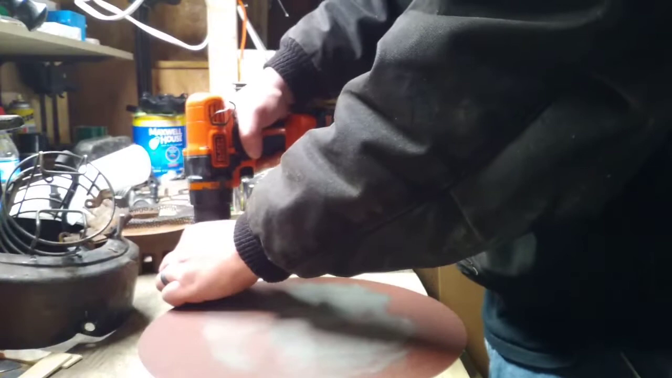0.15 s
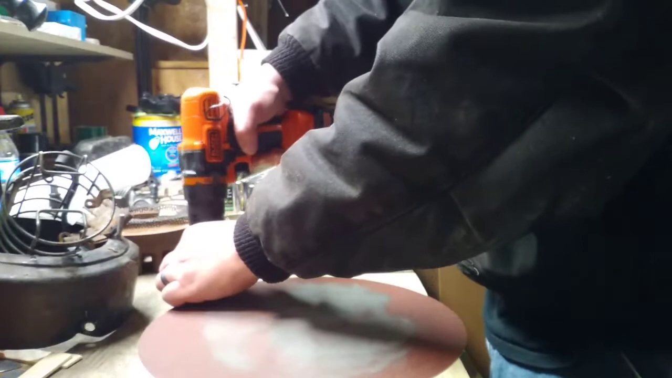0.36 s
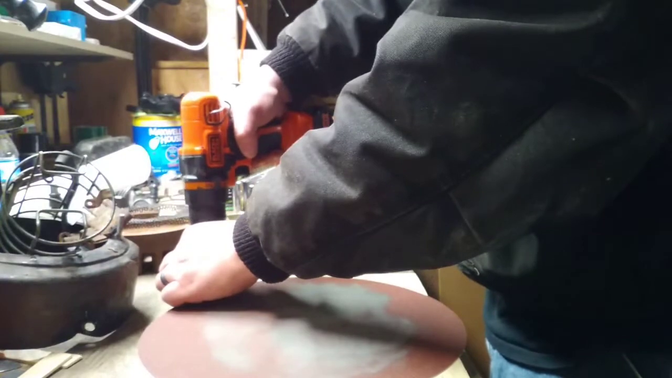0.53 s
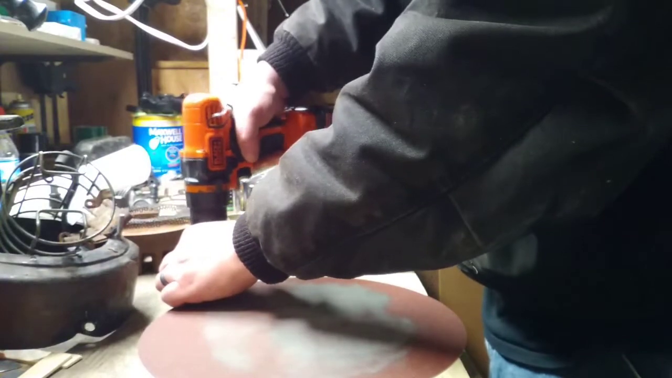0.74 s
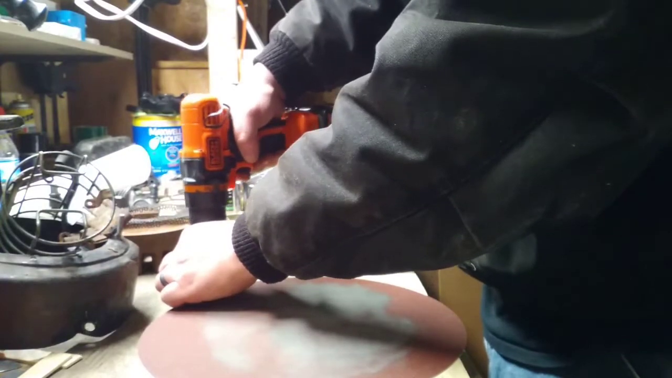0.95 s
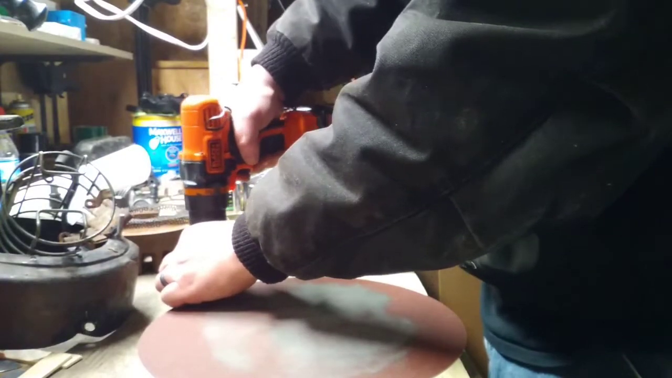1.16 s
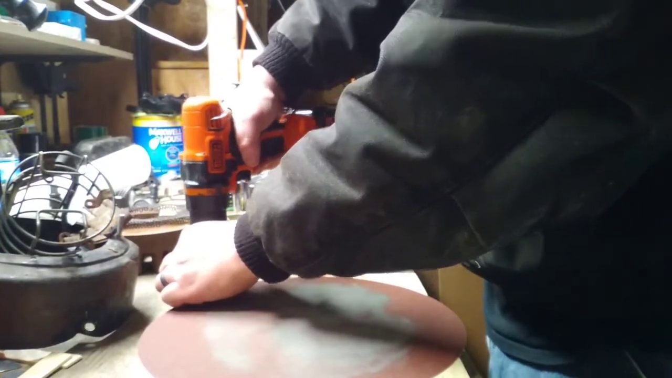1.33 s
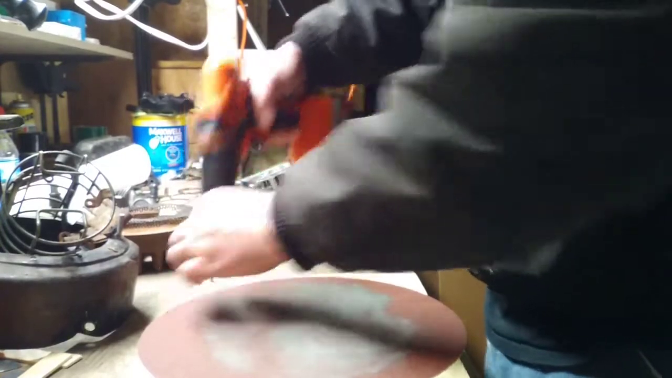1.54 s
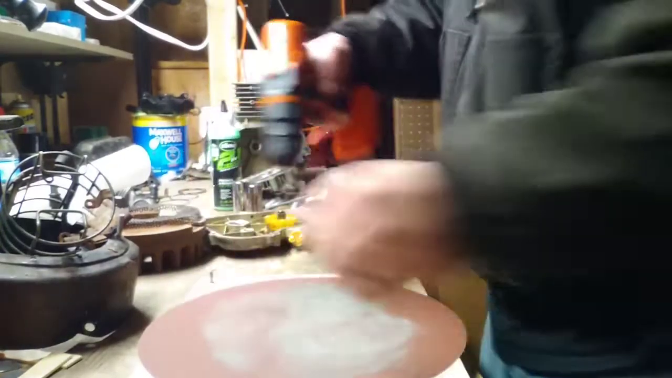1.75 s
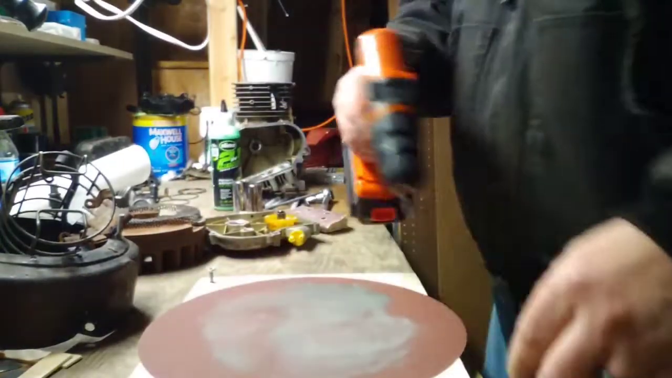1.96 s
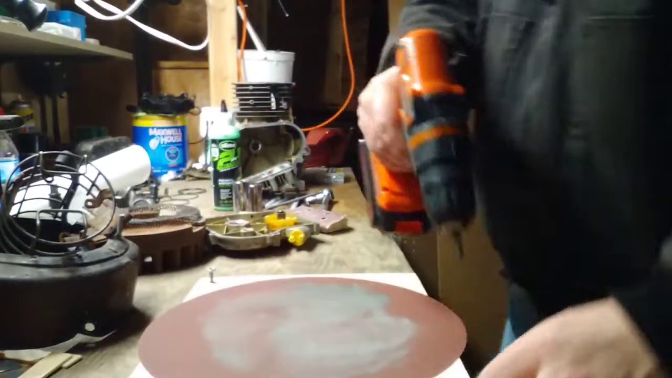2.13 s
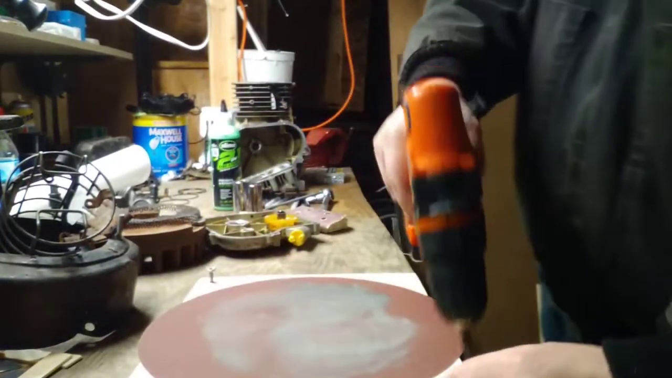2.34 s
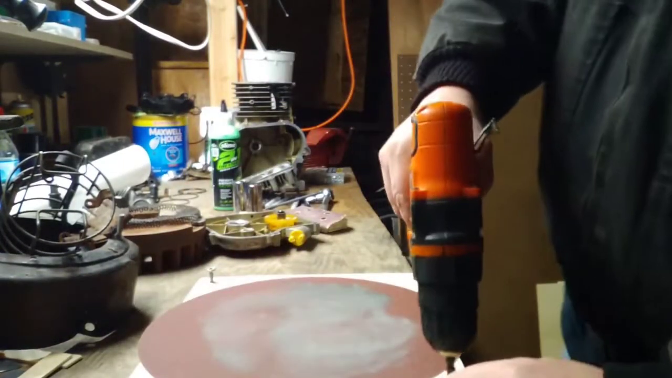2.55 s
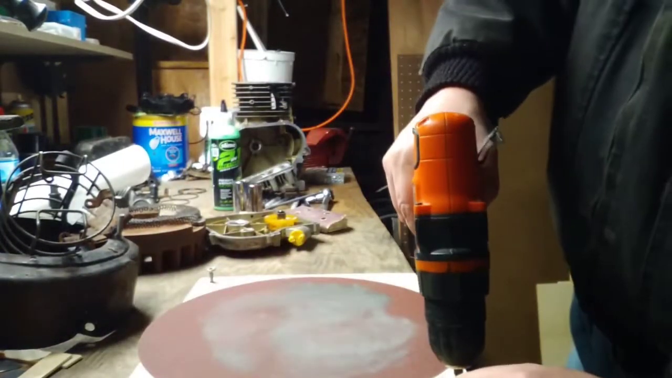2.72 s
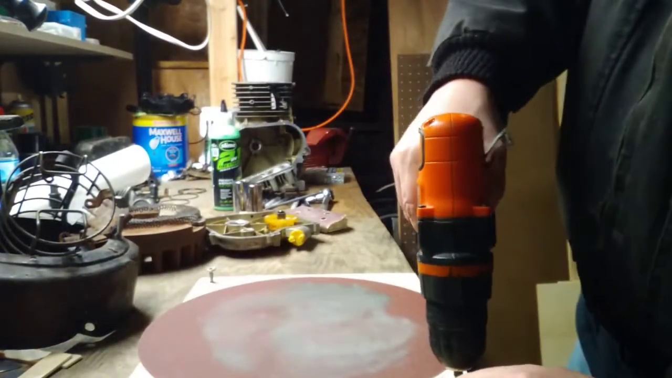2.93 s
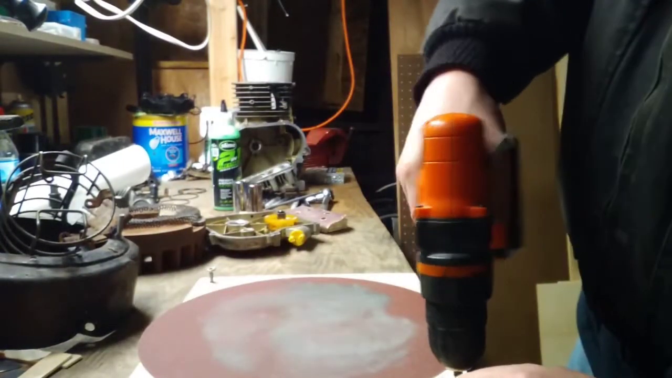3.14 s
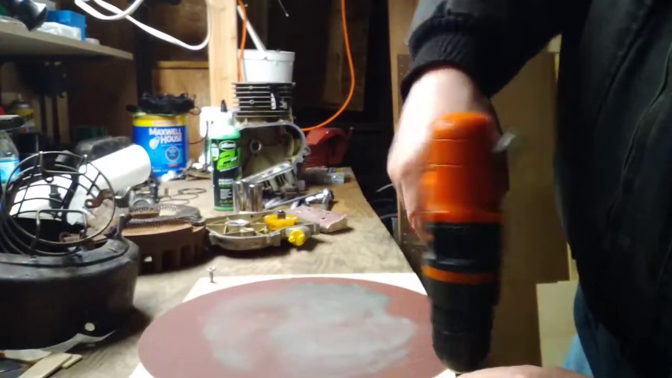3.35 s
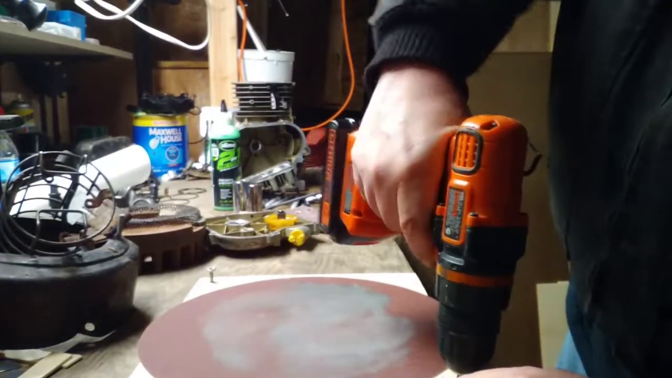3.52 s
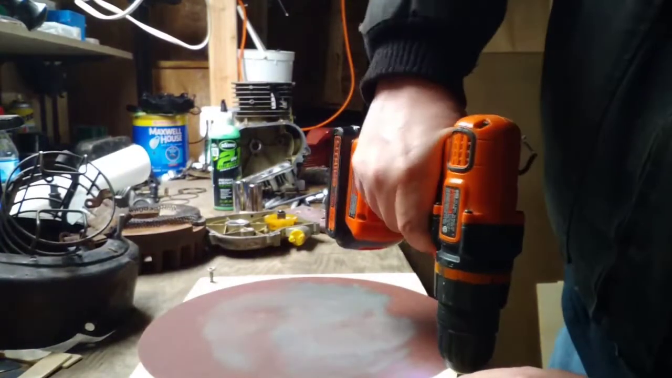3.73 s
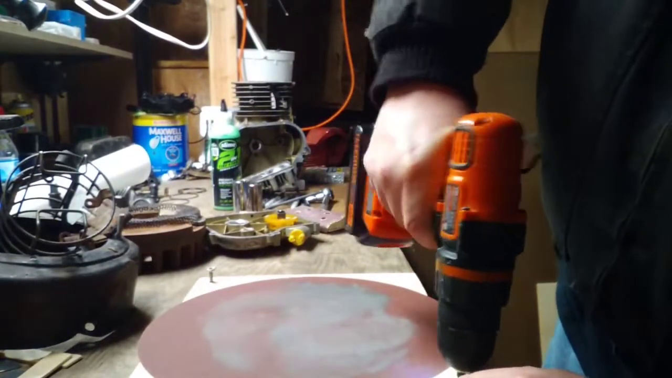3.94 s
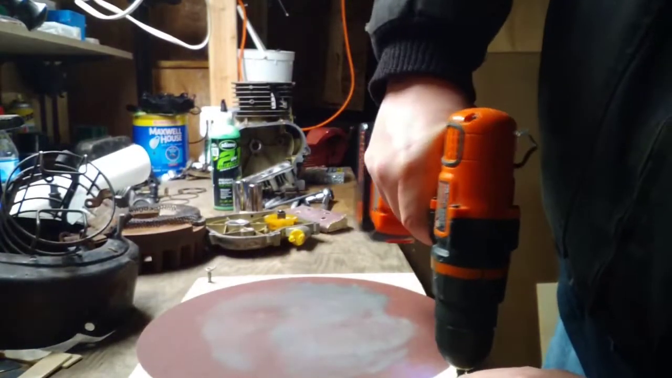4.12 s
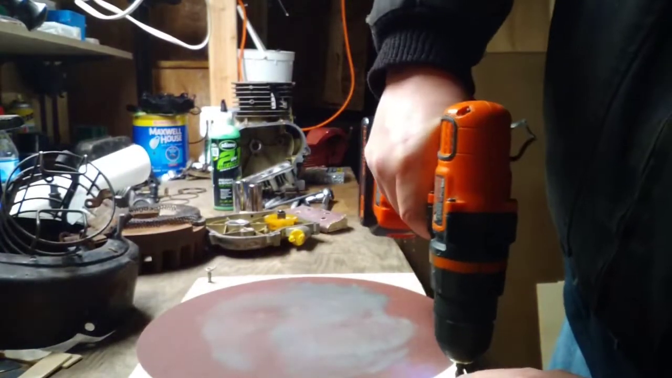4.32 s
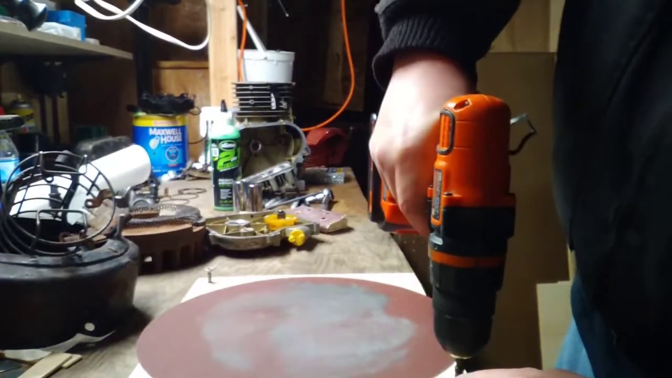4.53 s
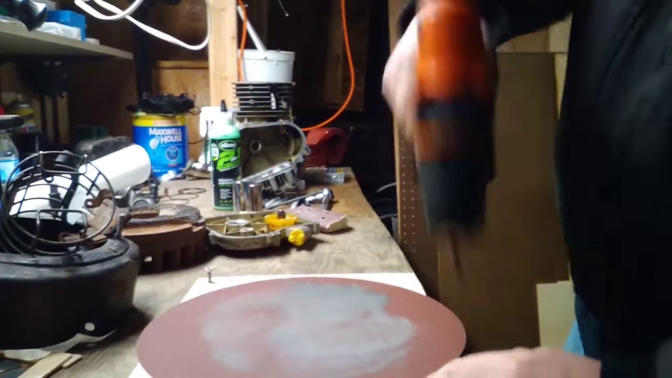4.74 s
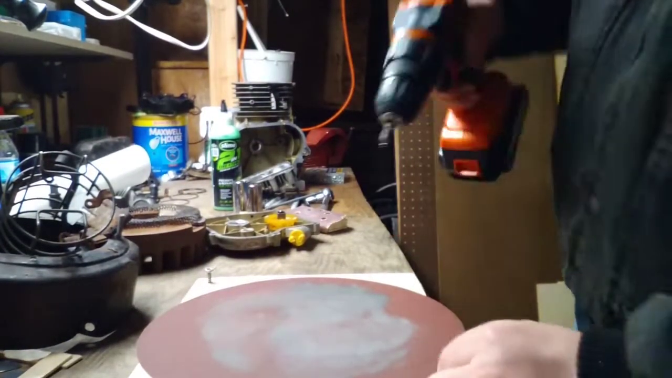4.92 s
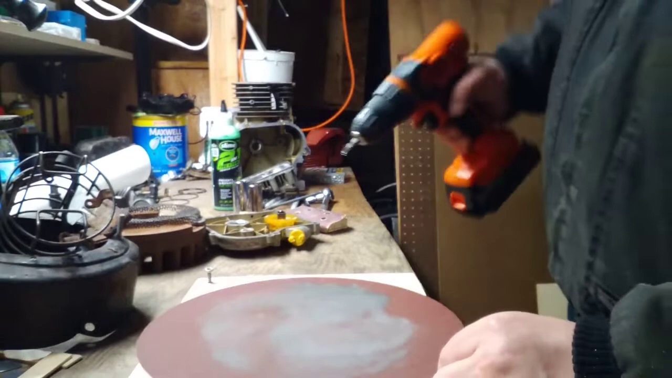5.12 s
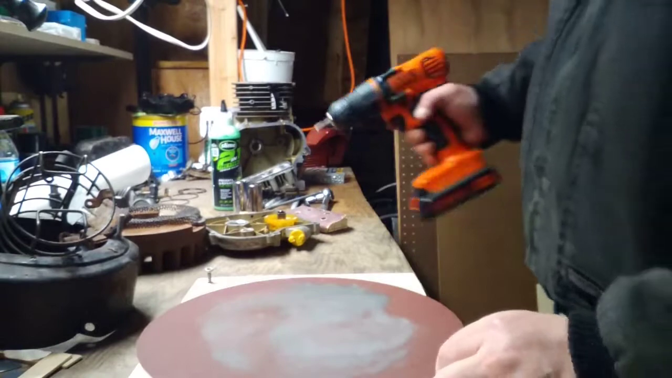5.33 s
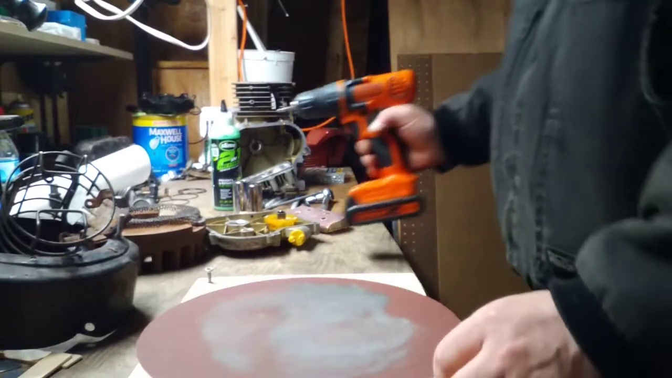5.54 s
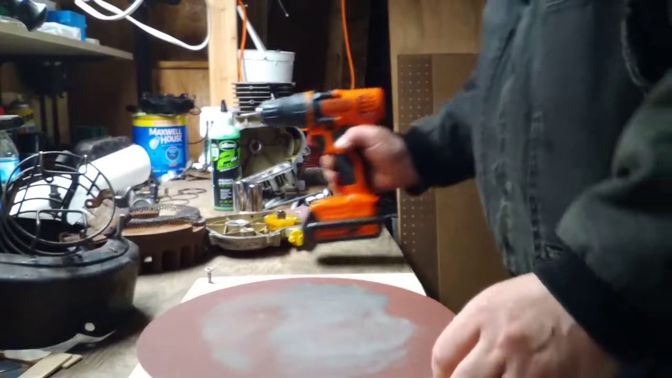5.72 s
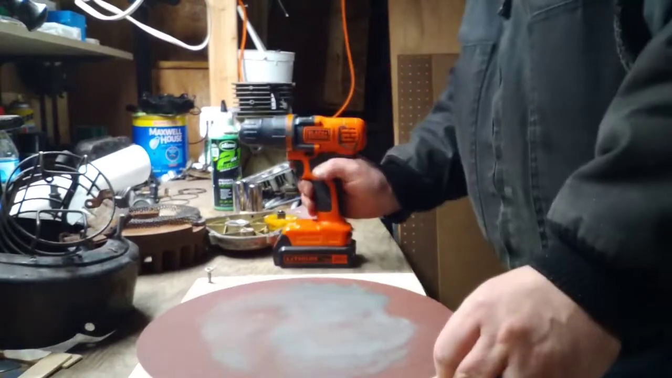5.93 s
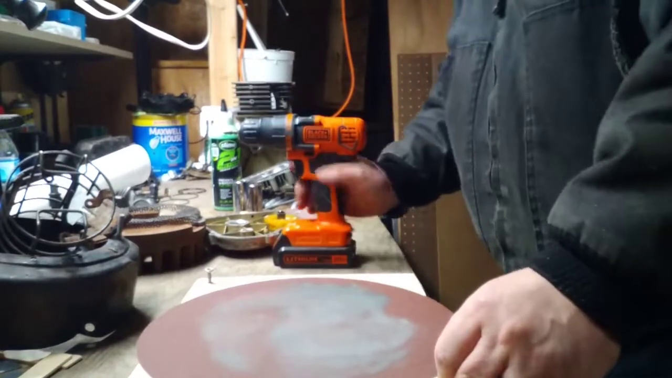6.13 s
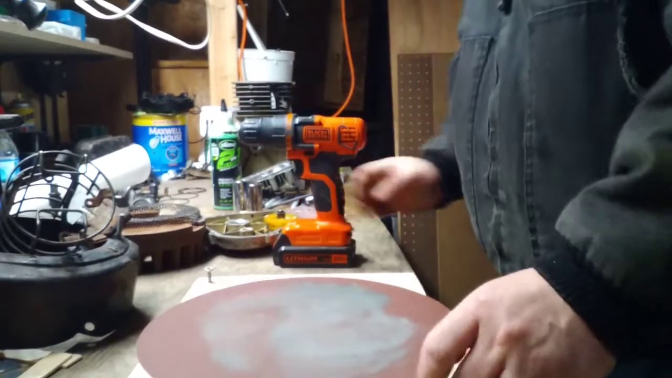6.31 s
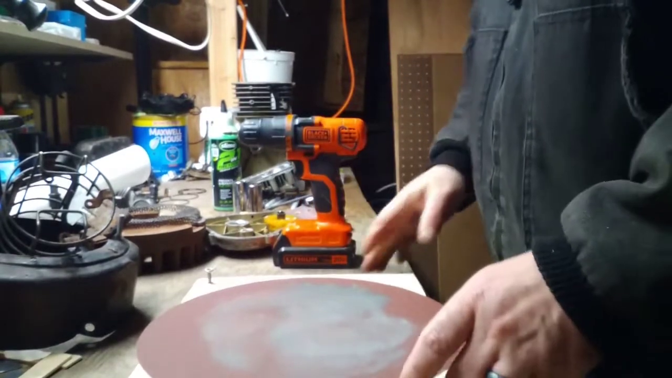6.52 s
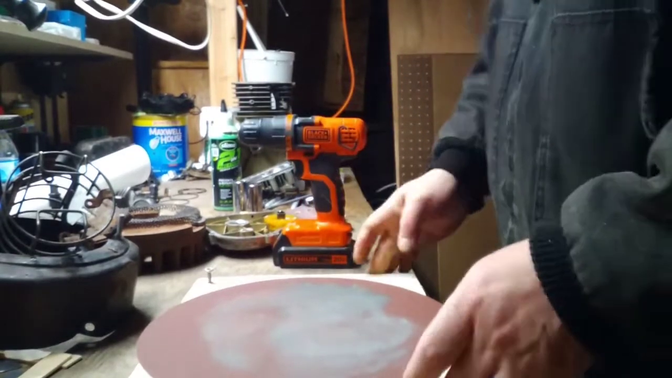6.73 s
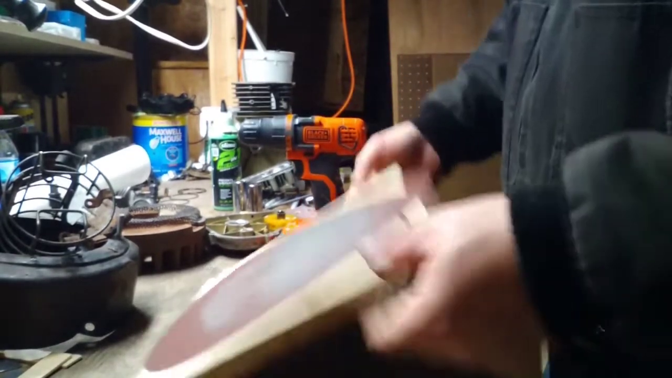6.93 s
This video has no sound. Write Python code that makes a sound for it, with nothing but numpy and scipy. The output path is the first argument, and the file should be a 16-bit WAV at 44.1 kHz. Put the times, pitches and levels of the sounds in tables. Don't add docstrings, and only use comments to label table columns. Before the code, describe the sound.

Phone-style stereo close to a workbench in a small shed with short reflections and soft hiss. A cordless drill gives a brief loaded growl, then, after clothing rustle, crisp bit ticks and knocks on a board, a second, longer whining run that rises in pitch and stops quickly. The tool is put down with a heavy knock and a short metallic jingle, leaving faint clicks, sleeve rustle and a low distant drone.

```python
import sys
import numpy as np
from scipy import signal
from scipy.fft import rfft, irfft, next_fast_len
from scipy.io import wavfile
from scipy.ndimage import map_coordinates

SR = 44100
rng = np.random.default_rng(int(sys.argv[2]) if len(sys.argv) > 2 else 0)


def how_loud(loudness_db):
    steps = np.asarray(loudness_db, float) / 20
    return 10 ** steps


def transcribe(u):
    v = np.clip(np.atleast_2d(u).T, -1, 1)
    q = np.round(v * 32767).astype(np.int16)
    wavfile.write(sys.argv[1], SR, q)


N = 307394

MIC_GAP_S = 20.8 / 44100
LEAD_S = .005

# (frequency [Hz], density [dB per Hz])
AIR_SPECTRUM = [(20, -61.5), (50, -10), (95, -0.5), (180, -6.5), (300, -14), (600, -18), (900, -19.5),
                (1400, -24), (2000, -23.5), (2900, -27.5), (5000, -35), (9000, -42.5), (14200, -45.5),
                (15500, -92)]
# (time [s], level [dB])
RUMBLE_LEVEL = [(0, -74.5), (.6, -69), (1.8, -76), (2.3, -69.5), (3.3, -77.5), (3.8, -65), (5.1, -69),
                (5.9, -62.5), (7, -65.5)]
# (middle [s], half length [s], level over the still air [dB])
SLEEVES = [(0, 0.08, 8.5), (1.716, 0.12, 7), (2.08, 0.27, 5), (2.423, 0.18, 7.5), (2.717, 0.13, 4.5),
           (3.52, 0.039, 4.5), (5.075, 0.22, 7), (6.413, 0.16, 4.5), (6.6, 0.085, 6), (6.794, 0.025, 14.5),
           (6.804, 0.26, 6.5)]
# (start [s], end [s], first frequency [Hz], last frequency [Hz], level [dB])
DRONE_PARTIALS = [(0, 0.573, 87.8, 93.5, -68), (1.596, 2.3, 140.6, 141.5, -78),
                  (3.051, 3.55, 88, 86.7, -71.5), (3.201, 3.553, 173, 181, -80),
                  (3.68, 3.85, 90, 88, -72.5), (4.809, 5.098, 93.8, 93.5, -70.5),
                  (4.801, 5.5, 155.5, 162, -71.5), (5.248, 6.102, 93.4, 99.1, -64.5),
                  (5.5, 6.051, 413.4, 420, -86), (5.615, 6.103, 171.9, 172.6, -66.5),
                  (6.248, 7.1, 105, 114.5, -70), (6.25, 6.497, 185, 179, -77),
                  (6.416, 6.851, 148, 151.4, -67.5), (6.699, 7.1, 185.4, 183, -68)]
# (frequency [Hz], t60 [s])
SHED_DECAY = [(100, .22), (400, .18), (1100, .14), (8000, .14)]
# (time [s], left lag [samples])
SOURCE_LAG = [(0, -7.5), (.9, -5), (1.1, -1.5), (1.6, -4), (2.3, 5), (3.5, 11), (4.8, 3), (6.0, -4.5),
              (7, -2)]
# (frequency [Hz], gain [ratio])
CROSS_GAIN = [(100, .93), (2100, .93), (5300, .85), (8400, .4), (12000, .1)]

# (frequency [Hz], width [Hz], level [dB])
BENCH_MODES = [(80, 38, -0.5), (119, 49, -1), (173.3, 42, -2), (249.3, 11, -11)]
BOARD_MODES = [(289, 24, 6), (419, 85, -0.5), (614, 140, -2.5), (795.4, 190, -5), (1263, 760, -16)]
HOUSING_MODES = [(1513.6, 360, -1), (2420, 380, -0.5), (3260, 980, -6)]
STEEL_MODES = [(3900, 480, 3.5), (5300, 3600, 5.5), (6020, 4500, 5), (9000, 2500, -6),
               (12600, 14000, -13.5)]
# (frequency [Hz], width [Hz], level [dB])
BOOM_MODES = [(195, 8.1, -0.5), (85, 59, -8)]
GEARBOX_MODES = [(607, 45, 0)]
# (frequency [Hz], level [dB], t60 [s])
LOOSE_PARTS = [(2800, -9, .3), (5190, -8, .3), (5450, -9, .24), (6850, -13, .2), (7780, -13, .18)]

# (time [s], frequency [Hz], level [dB])
SQUEAK_GLIDE = [(3.686, 4700, -97), (3.692, 4800, -80), (3.704, 5300, -81.5), (3.714, 4900, -97.5)]
# (time [s], peak [dB], knock [dB], fizz [dB])
SWITCH_TICKS = [(0.5781, -35, -14.5, -18), (1.0555, -53, 1.5, -10), (1.5489, -50.5, 4.5, -8.5),
                (1.9384, -56.5, -1.5, -17), (2.0394, -71, 3, -19), (2.2044, -69, -6, -7),
                (2.2373, -49.5, -7, -20.5), (2.4895, -60, -21, -15.5), (3.1494, -62, 0, -10.5),
                (3.4092, -61, 4.5, -10), (3.6601, -53, -4.5, -13), (3.8024, -56.5, -2.5, -16.5),
                (3.8536, -37.5, -6, -21.5), (6.2994, -69, 7, -3), (6.7894, -73, -1, 7)]
# (time [s], peak [dB], knock [dB], fizz [dB])
BIT_TICKS = [
    (1.0156, -65.5, -16.5, 1.5),
    (1.1167, -35.5, 0.5, -13.5),
    (1.718, -61, -18.5, -8),
    (2.0931, -46.5, -23.5, -5),
    (2.2852, -19, -14.5, -4),
    (3.8207, -47.5, -13, -5),
    (4.8194, -70, -8, -11),
    (6.5594, -68, -8.5, -7),
]
# (time [s], peak [dB], thud [dB], knock [dB], fizz [dB])
BOARD_KNOCKS = [(0.652, -51.5, 4, 2.5, -28), (0.6839, -48, 5, 5, -29), (0.8421, -28.5, 8.5, 10.5, -17.5),
                (1.125, -33.5, -18, 2, -12), (1.3424, -17.5, 4.5, 7.5, -10), (1.4032, -37, -2.5, -0.5, -24),
                (2.852, -33, 4, 12.5, -33), (2.8774, -39, 6.5, 6, -35), (2.9718, -22, -9, 5, -20.5),
                (3.5541, -29.5, -3, -7.5, -12), (3.9273, -16.5, -12.5, -4.5, -8),
                (4.7863, -60.5, -2.5, 10.5, -18.5), (6.0474, -12, 1, 5.5, -27.5),
                (6.1988, -48.5, 4.5, 3, -17), (6.8929, -58, 26.5, 21, -25)]
# (time [s], peak [dB])
GEAR_STARTS = [
    (1.122, -20.5),
    (3.928, -22.5),
]

# (pull [s], release [s], top speed [Hz], slow sag [Hz], spin-up [s])
TRIGGER_PULLS = [
    (1.11, 1.364, 336, 0, .057),
    (3.917, 4.63, 363.6, 83, .038),
]
# (frequency [Hz], density [dB per Hz])
LOADED_COLOUR = [(20, -63.5), (70, -12), (180, 4.5), (450, -2.5), (800, -7), (1400, -9.5), (2100, -8.5),
                 (2900, -12), (4500, -16), (6700, -22.5), (9500, -22.5), (12500, -23.5), (14200, -54.5),
                 (15500, -89.5)]
FREE_COLOUR = [(20, -61), (70, -17.5), (180, -2), (450, -6.5), (800, -4), (1400, -2), (2100, -1.5),
               (2900, -4), (4500, -12.5), (6700, -14.5), (9500, -18.5), (12500, -16.5), (14200, -32.5),
               (15500, -85.5)]
SHAFT_ORDERS = [1, 1.25, 2, 2.5, 3.75, 5, 6.25, 7.5, 8.75, 10, 11.25, 12, 13, 15, 18]
LOADED_WHINE = [-3, -12, -13, -15, -19, -8, -22, -20, -24, -14, -24, -20, -24, -16, -24]
FREE_WHINE = [-10.5, -22, -24, -7.5, -9.5, -11, -12.5, -14, -18, -22, -14.5, -17.5, -18, -13, -17]
# (order [multiple], level [dB])
BRUSH_COMB = [(19, -27), (24, -23), (27, -19.5), (32, -24), (38, -28), (43, -31)]
# (frequency [Hz], width [Hz], gain [dB])
SHELL_SWELLS = [(305, 27, 8), (775, 45, 4), (1570, 55, 4), (4650, 300, 4.5), (6150, 200, 6),
                (9200, 350, 4.5)]


def unit(x):
    return x / np.sqrt(np.mean(x ** 2) + 1e-20)


def along(points, hz):
    f, v = np.transpose(points)
    return np.interp(np.log(hz + 1), np.log(f + 1), v)


def curves(rows, t):
    s, *columns = np.transpose(rows)
    return [np.interp(t, s, column) for column in columns]


def wobble(rate, size):
    knots = rng.standard_normal(int(size * rate / SR) + 4)
    coarse = map_coordinates(knots, [np.arange(size // 16 + 2) * 16 * rate / SR])
    return np.interp(np.arange(size) / 16, np.arange(len(coarse)), coarse)


def filtered(x, response):
    n = x.shape[-1]
    m = next_fast_len(n + 4096)
    return irfft(rfft(x, m) * response(np.fft.rfftfreq(m, 1 / SR)), m)[..., :n]


def modes(peaks):
    low = peaks[0][0] / 1.6
    top = 1.4 * max(peak[0] for peak in peaks)

    def response(f):
        highpass = 1j * f / (low + 1j * f)
        lowpass = 1 / (1 + 1.2j * f / top - (f / top) ** 2)
        total = 0
        for k, (hz, width, db) in enumerate(peaks):
            total = total + (-1) ** k * how_loud(db) * 1j * f * width / (hz * hz - f * f + 1j * f * width)
        return highpass * lowpass * total
    return response


def alike(hz):
    return .87 * np.sinc(2 * hz * MIC_GAP_S)


def diffuse(size):
    def weights(f):
        turn = np.arccos(alike(f)) / 2
        return np.array([np.cos(turn), np.sin(turn)])
    mid, side = filtered(rng.standard_normal((2, size)), weights)
    return np.array([mid + side, mid - side])


def placed(x, s):
    lag = curves(SOURCE_LAG, s)[0] / SR
    return filtered(x, lambda f: np.exp(-1j * np.pi * f * lag * np.array([[1], [-1]])))


def shed(x, s, wet_db):
    hz, t, z = signal.stft(diffuse(SR // 3), SR, nperseg=256)
    decay = how_loud(-60 * t / along(SHED_DECAY, hz)[:, None])
    tail = signal.istft(z * decay, SR, nperseg=256)[1]
    tail = tail / np.linalg.norm(tail[0])
    delayed = np.pad(x, (130, 0))
    wet = signal.fftconvolve(delayed[None], tail, axes=1)[:, :len(x)]
    return placed(x, s) + how_loud(wet_db) * wet


def shifting(x, s, wet_db, count):
    spot = np.linspace(0, count - 1, len(x))
    return sum(shed(x * np.maximum(1 - np.abs(spot - k), 0), s, wet_db) for k in range(count))


def add(out, x, s):
    part = out[:, round(s * SR):][:, :x.shape[1]]
    part += x[:, :part.shape[1]]


def background():
    t = np.arange(N) / SR
    brush_db = np.max([db * np.exp(-((t - s) / half) ** 2) for s, half, db in SLEEVES], axis=0)
    layers = [(curves(RUMBLE_LEVEL, t)[0], 25, 240, 2.5),
              (-82 + brush_db, 260, 2300, 1.5),
              (-88.5 + .9 * brush_db, 2300, 15000, .8)]
    out = 0
    for db, low_hz, top_hz, drift_db in layers:
        def band(f):
            return how_loud(along(AIR_SPECTRUM, f)) / np.sqrt((1 + (low_hz / (f + 1)) ** 8) * (1 + (f / top_hz) ** 8))
        drift = drift_db * (wobble(2.1, N) + wobble(19, N))
        out = out + how_loud(db + drift) * unit(filtered(diffuse(N), band))
    return how_loud(4.0) * out


def drone(start, end, first_hz, last_hz, db):
    t = np.arange(round((end - start) * SR)) / SR
    hz = first_hz + (last_hz - first_hz) * t / t[-1]
    swell = np.minimum(np.minimum(t, t[-1] - t) / .025, 1)
    level = how_loud(db + 5 + 3.9 * wobble(6.9, len(t)))
    wander = .5 * np.array([wobble(3.2, len(t)), wobble(6.3, len(t))])
    return swell * level * np.sin(2 * np.pi * np.cumsum(hz) / SR + wander)


def squeak():
    t = SQUEAK_GLIDE[0][0] + np.arange(SR // 8) / SR
    hz, db = curves(SQUEAK_GLIDE, t)
    return shed(how_loud(db) * np.sin(2 * np.pi * np.cumsum(hz) / SR), t[0], wet_db=-17.0)


def rattling_parts():
    t = np.arange(SR // 2) / SR
    ring = 0
    for hz, db, t60 in LOOSE_PARTS:
        ring = ring + how_loud(db - 60 * t / t60) * np.sin(2 * np.pi * hz * t + 1.8 * wobble(120, len(t)))
    jolts = rng.standard_normal(len(t)) * how_loud(4.1 * wobble(70, len(t)))
    chatter = unit(filtered(jolts, modes(HOUSING_MODES + STEEL_MODES))) * how_loud(-3.5 - 60 * t / 0.33)
    onset = 1 - np.exp(-t / 0.0028)
    return shed(how_loud(-41) * (ring + chatter) * onset, 6.05, wet_db=1.0)


def blow(s, t60, bodies, rise, contact, tail_db, snap):
    t = np.arange(round(1.6 * t60 * SR)) / SR
    after = np.maximum(t - LEAD_S, 0)
    graze = how_loud(-23) * np.minimum(t / LEAD_S, 1)
    force = (graze + 1 - np.exp(-after / rise)) * np.exp(-after / contact)
    burst = rng.standard_normal(len(t)) * force
    burst[round(LEAD_S * SR)] += snap
    direct = placed(burst, s)
    air = diffuse(len(t)) * (1 - np.exp(-after / 0.0015))
    out = 0
    for body, db, slow in bodies:
        tail = air * how_loud(tail_db - 60 * (t / (slow * t60)) ** 1.276)
        layer = filtered(direct + tail, modes(body))
        out = out + how_loud(db) * layer / np.abs(layer).max()
    return out


def tick(s, db, knock_db, fizz_db, ring_hz):
    bodies = [(BOARD_MODES, db + knock_db + 2, 1.05),
              (HOUSING_MODES + [(ring_hz, 500, 1.5)], db + 2, .95),
              (STEEL_MODES, db + fizz_db + 4.5, .9)]
    return blow(s, .13, bodies, rise=0.0016, contact=0.0049, tail_db=-16.5, snap=4.0)


def knock(s, db, thud_db, knock_db, fizz_db):
    t60 = np.clip(0.22 + 1 * thud_db, .135, 0.2)
    bodies = [(BENCH_MODES, db + thud_db + 6.5, 1.1),
              (BOARD_MODES, db + knock_db + 2.5, 1.05),
              (HOUSING_MODES, db + 2.0, .97),
              (STEEL_MODES, db + fizz_db + 7.5, .85)]
    return blow(s, t60, bodies, rise=0.0013, contact=0.007, tail_db=-8.5, snap=8)


def gear_start(s, db):
    return blow(s, 0.12, [(GEARBOX_MODES, db, 1)], rise=0.0058, contact=0.0072, tail_db=-14, snap=.1)


def speed(t, release, top_hz, sag_hz, spin_up):
    start_hz, easing_s, brake_hz_per_s2 = 130, .5, 15000
    missing = (top_hz - sag_hz - start_hz) * np.exp(-t / spin_up) + sag_hz * np.exp(-t / easing_s)
    braking = brake_hz_per_s2 * np.maximum(t - release, 0) ** 2
    return np.maximum(top_hz - missing - braking, start_hz / 2)


def swell_db(hz):
    grid = np.arange(0, SR / 2, 4)
    gain_db = sum(db * np.exp(-((grid - c) / w) ** 2) for c, w, db in SHELL_SWELLS)
    return np.interp(hz, grid, gain_db)


def motor(pull, colour, orders_db, level_db, grows_db, whine_db, fizz_db, boom_db, gate, lumps_db, wet_db):
    start, held = pull[0], pull[1] - pull[0]
    t = np.arange(round((held + .35) * SR)) / SR
    after = np.maximum(t - held, 0)
    fade_db = 38 * (after / 0.092) ** 3.0
    effort = how_loud(level_db + grows_db * np.minimum(t / held, 1) - fade_db) * (1 - np.exp(-t / .007))
    dull_db = -151 * after
    hz = speed(t, held, *pull[2:])
    turn = 2 * np.pi * np.cumsum(hz * (1 + .001 * wobble(40, len(t)))) / SR

    lumps = how_loud(lumps_db * wobble(180, len(t)))
    teeth = rng.standard_normal(len(t)) * (1 + gate * np.cos(turn)) * lumps
    body = unit(filtered(teeth, lambda f: how_loud(along(colour, f))))
    fizz = filtered(body, lambda f: 1 / (1 + (3000 / (f + 1)) ** 4))
    boom = unit(filtered(teeth, modes(BOOM_MODES)))
    rattle = body + (how_loud(fizz_db + dull_db) - 1) * fizz + how_loud(boom_db) * boom

    orders = list(zip(SHAFT_ORDERS, orders_db))
    orders += [(k, along(BRUSH_COMB, k) + rng.normal(0, 2.5)) for k in range(19, 43)]
    whine = 0
    for k, db in orders:
        level = how_loud(db + swell_db(k * hz) + 1.6 * wobble(14, len(t)))
        whine = whine + level * np.sin(k * turn + .45 * wobble(45, len(t)))
    late_db = -11.5 * np.exp(-t / .05)
    near = shed(effort * how_loud(whine_db + late_db + dull_db) * whine, start, wet_db=-7)
    return shifting(effort * rattle, start, wet_db, count=7) + near


def scene():
    out = background()
    for row in DRONE_PARTIALS:
        add(out, drone(*row), row[0])
    add(out, squeak(), SQUEAK_GLIDE[0][0])
    add(out, rattling_parts(), 6.05)
    for table, ring_hz in [(SWITCH_TICKS, 1400), (BIT_TICKS, 3170)]:
        for row in table:
            add(out, tick(*row, ring_hz), row[0] - LEAD_S)
    for row in BOARD_KNOCKS:
        add(out, knock(*row), row[0] - LEAD_S)
    for row in GEAR_STARTS:
        add(out, gear_start(*row), row[0] - LEAD_S)
    first, second = TRIGGER_PULLS
    add(out, motor(first, LOADED_COLOUR, LOADED_WHINE, level_db=-39.5, grows_db=4.5, whine_db=0.5, fizz_db=0.2,
                   boom_db=-8, gate=0.45, lumps_db=1.5, wet_db=3.0), first[0])
    add(out, motor(second, FREE_COLOUR, FREE_WHINE, level_db=-31.5, grows_db=-1.5, whine_db=1.0, fizz_db=-1.0,
                   boom_db=-10.5, gate=.55, lumps_db=3.0, wet_db=3.5), second[0])
    return out


def widened(hz):
    copy = along(CROSS_GAIN, hz) * np.exp(-2j * np.pi * hz * MIC_GAP_S)
    mid_power = (1 + alike(hz)) * np.abs(1 - copy) ** 2
    side_power = (1 - alike(hz)) * np.abs(1 + copy) ** 2
    return np.array([1 - copy, 1 + copy]) / np.sqrt((mid_power + side_power) / 2)


def roll_off(x):
    return signal.sosfilt(signal.butter(12, 14760, fs=SR, output="sos"), x)


def record(dry):
    def tilt(hz):
        tilt_db = along([(100, 1.1), (400, 0.26), (3000, 0.9), (9500, 8.4), (14000, 2)], hz)
        return how_loud(tilt_db * np.array([[1], [-1]]))

    def band(hz):
        return 1 / (1 + (hz / 14150) ** 50) * (1j * hz / (42 + 1j * hz)) ** 2
    left, right = filtered(dry, tilt)
    mid_side = np.array([left + right, left - right]) / 2
    mid, side = filtered(mid_side, lambda hz: widened(hz) * band(hz))
    return roll_off(np.array([mid + side, mid - side]))


dry = scene()
out = record(dry)
transcribe(out)
```